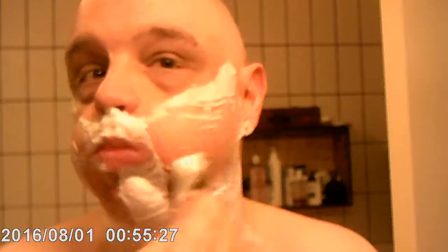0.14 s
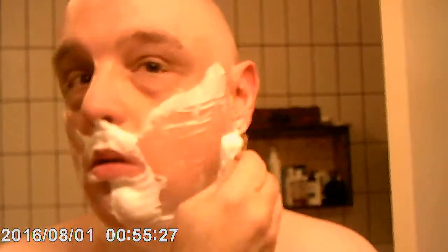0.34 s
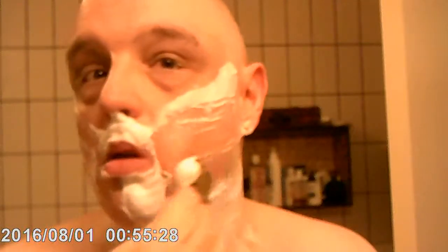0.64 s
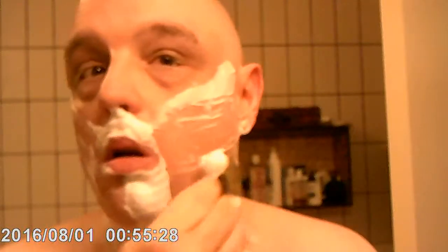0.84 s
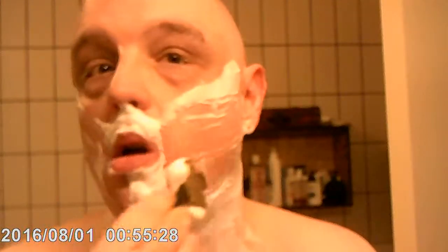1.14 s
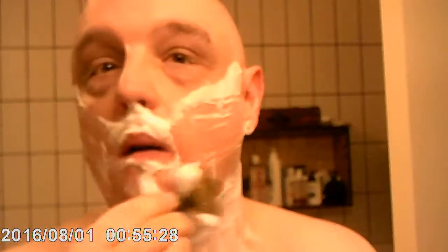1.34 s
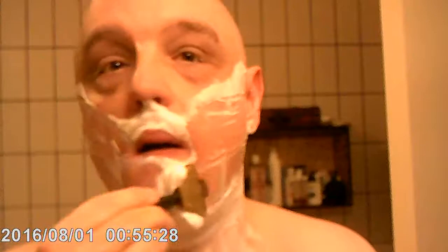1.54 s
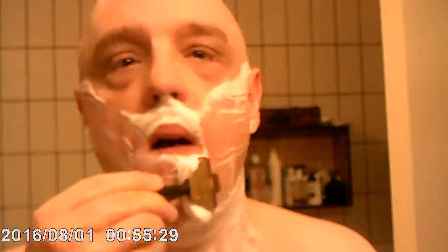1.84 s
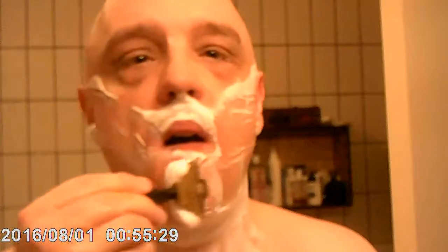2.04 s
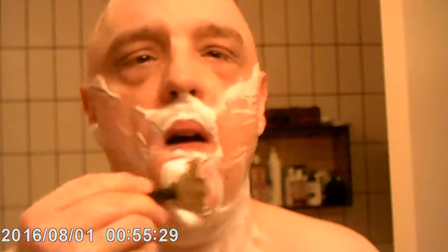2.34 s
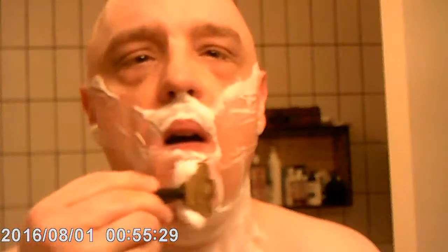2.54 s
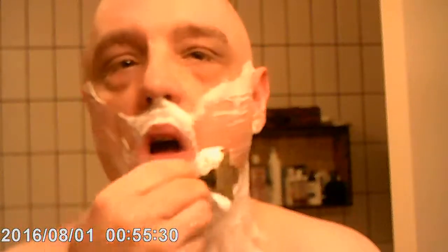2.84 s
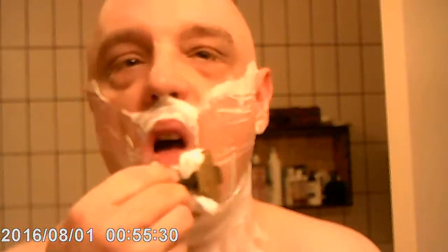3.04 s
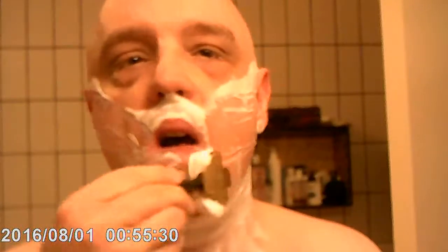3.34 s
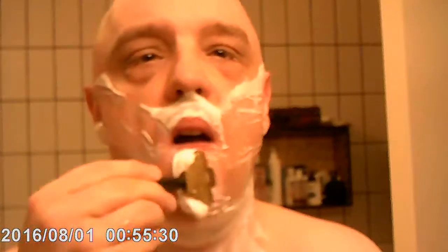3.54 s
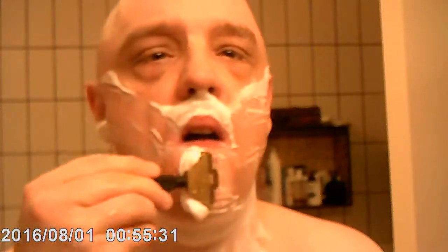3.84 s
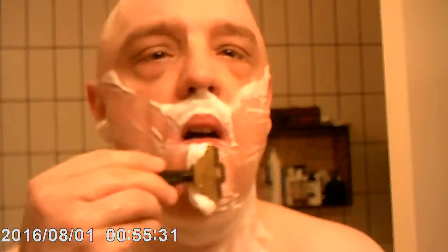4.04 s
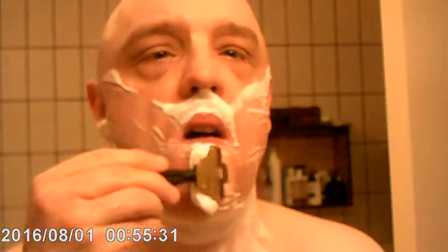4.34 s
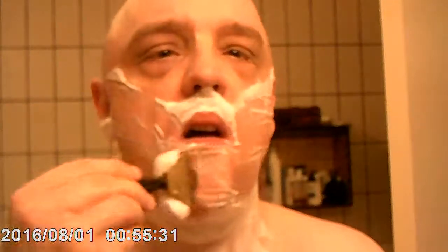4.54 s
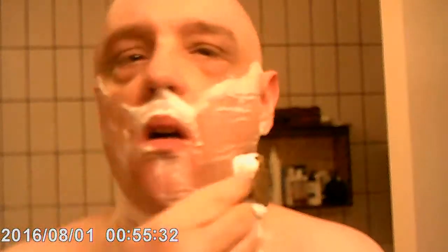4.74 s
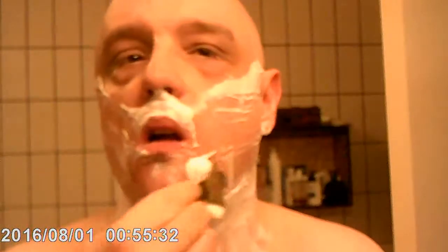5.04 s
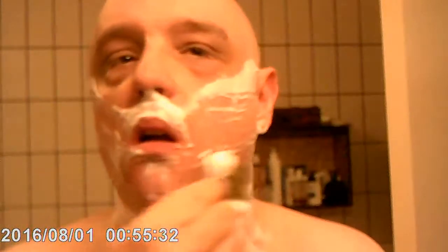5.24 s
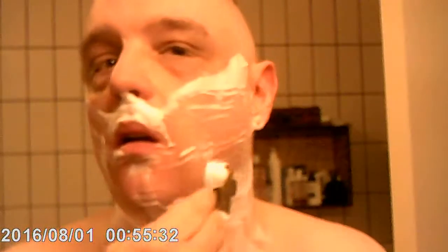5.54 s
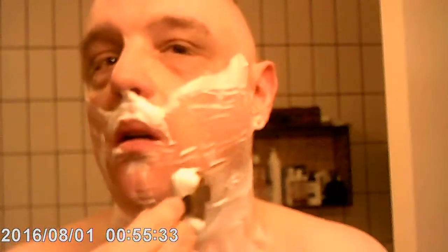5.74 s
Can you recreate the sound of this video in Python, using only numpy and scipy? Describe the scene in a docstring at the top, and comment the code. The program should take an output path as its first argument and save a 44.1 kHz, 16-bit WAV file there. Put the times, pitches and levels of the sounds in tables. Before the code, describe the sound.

In a small tiled bathroom, an extractor fan keeps up a low, gently throbbing hum. Close to a small, dull-sounding microphone, a razor starts rasping through wet stubble, and a soft pop of the lips follows almost at once. Brief scratchy strokes continue with little gaps, some single and some in quick pairs, the blade ticking on hairs. One clear tap stands out midway, and the strokes bunch together near the end.

```python
"""Wet shave in a tiled bathroom

Close up, a safety razor scrapes through lathered stubble in short strokes; each cut hair flicks the
steel blade. Early on, puffed cheeks let go with a dull pop of the lips. The small room answers, and
behind it all an extractor fan hums and rumbles, throbbing five times a second.
Heard through a small, narrow-band camera microphone."""
import sys
import numpy as np
from scipy import signal
from scipy.fft import rfft, irfft, next_fast_len
from scipy.io import wavfile
from scipy.ndimage import uniform_filter1d, map_coordinates

SR = 44100
rng = np.random.default_rng(int(sys.argv[2]) if len(sys.argv) > 2 else 0)


def file_out(sig):
    """Save sig as 16-bit WAV at sys.argv[1]."""
    # one column per channel
    cols = np.atleast_2d(sig).T
    # limit, then scale
    lim = np.clip(cols, -1, 1)
    pcm = np.round(lim * 32767).astype(np.int16)
    wavfile.write(sys.argv[1], SR, pcm)


N = 259749


def scrape():
    """The razor, close up: hairs snap on the edge in clumps and ring the blade's modes."""
    # modes of blade and razor head in three groups: f/Hz, width/Hz, level/dB
    low_modes = [(1024, 35, -6), (1180.5, 30, -2.5), (1268.5, 25, 1), (1336, 50, -6)]
    mid_modes = [(1424, 21, -3.5), (1574, 38, -2), (1758, 79, -8), (1785, 33, -3.5), (1938, 62, -9.5)]
    edge_modes = [(2110, 49, -2), (2471, 37, 2), (2597, 140, -2), (2773, 380, -4)]
    grip_db, slip_db = 1.5, 2.6
    snaps = snap_train(per_second=4000, spread_db=0.9)
    snaps *= amp(grip_db * wobble(45) + slip_db * wobble(140))
    snaps /= np.sqrt(uniform_filter1d(snaps ** 2, size=SR // 30))  # the hand evens out the force
    snaps = band(snaps, low_hz=1033.0, high_hz=3730)  # a thin blade radiates no bass
    blade = [unit(ringing(snaps, modes)) for modes in (low_modes, mid_modes, edge_modes)]
    return np.sum(hand_pressure() * blade, axis=0)


def hand_pressure():
    """Gains on the low, middle and edge modes: each pull bites, swells, drags and lifts."""
    # pulls of the razor: t/s, swell/s, drag/s, level/dB, bite/dB re level, edge brightness/dB,
    # tilt/dB (+ favours the low modes)
    strokes = [(0.0, 0.086, 0.03, -55, -1, -5.5, -3), (0.093, 0.024, 0.11, -51.5, -7.5, -5.5, 0),
               (0.488, 0.016, 0.14, -53, -3.5, -7, 0.5), (0.602, 0.054, 0.12, -47, -9, -9.5, 1.5),
               (1.093, 0.035, 0.045, -48.5, -0.5, -6, 2), (1.198, 0.065, 0.068, -56.5, -4, -12, -5),
               (1.529, 0.018, 0.014, -53, -6, -8, -1.5), (1.586, 0.037, 0.079, -55, -8, -8.5, -6),
               (1.929, 0.07, 0.04, -46, -10, -10.5, 0.5), (2.255, 0.06, 0.014, -52, -4, -10, 3),
               (2.557, 0.056, 0.029, -50, -3, -10, 0.5), (2.995, 0.14, 0.076, -56, 0, -13, -2),
               (3.431, 0.034, 0.085, -52, -3.5, -11, 2.5), (3.774, 0.055, 0.027, -56.5, -7, -14.5, 1),
               (3.849, 0.027, 0.064, -57, 2, -8, -4.5), (4.127, 0.04, 0.031, -54, -7, -9.5, -0.5),
               (4.428, 0.012, 0.049, -54, -4.5, -12, 1.5), (4.952, 0.019, 0.017, -58.5, -2, -11.5, 3.5),
               (4.969, 0.039, 0.02, -47.5, -5.5, -11, 4), (5.047, 0.027, 0.11, -53.5, -4.5, -11.5, 1.5),
               (5.225, 0.021, 0.069, -62.5, -0.5, -20.5, 5.5), (5.493, 0.049, 0.028, -53, 0.5, -13.5, 1.5),
               (5.564, 0.029, 0.11, -48, -18, -11.5, 2), (5.656, 0.067, 0.056, -53.5, -6.5, -5.5, -2.5),
               (5.79, 0.02, 0.12, -63.5, -5, -11, -9)]
    touch_s, lift_s = 0.004, 0.036  # the blade bites fast and leaves slowly
    drag_end_db, off_skin_db = -10.5, -24
    gains, t = np.zeros((3, N)), np.arange(N) / SR
    for start, swell, drag, db, bite_db, edge_db, tilt_db in strokes:
        knots = start + np.cumsum([0, touch_s, swell, drag, lift_s])
        force_db = db + np.interp(t, knots, [off_skin_db, bite_db, 0, drag_end_db, off_skin_db])
        balance = amp([[tilt_db / 2 - 6.0], [-tilt_db / 2 - 4.0], [edge_db]])
        on_skin = (t > start) & (t < knots[-1])
        gains += balance * amp(force_db) * on_skin
    return gains


def catches():
    """A thick hair or a tap on the skin rings one mode, cracks along the edge and knocks the jaw."""
    # single loud catches of the blade: t/s, level/dB, f/Hz, relative crack level/dB
    snags = [(0.095, -45, 1250, -6), (0.117, -34, 1610, 3.5), (0.1333, -38, 1555, -6),
             (0.497, -58, 1330, -16), (0.608, -47, 1665, -15), (0.655, -46.5, 1290, -1.5),
             (0.9636, -41, 1240, -27), (1.063, -43, 1660, 2.5), (1.097, -38.5, 1486, -13.5),
             (1.103, -34, 1140, -4), (1.1335, -51, 1680, 4.5), (1.5436, -41, 1775, -7.5),
             (1.552, -41.5, 1506, -7.5), (1.6237, -40, 1530, -18), (1.9597, -49, 1615, -11),
             (2.0027, -38.5, 1580, -29), (2.2576, -41, 1600, -10), (2.273, -41, 1606, -15.5),
             (2.291, -40, 1490, -15.5), (2.31, -44, 1530, -21.5), (2.5608, -39.5, 1580, -11),
             (2.5979, -39.5, 1540, -12), (2.6124, -39, 1580, -13), (2.997, -39.5, 1530, -16),
             (3.05, -45, 1640, -14.5), (3.15, -44.5, 1600, -15), (3.4547, -33.5, 1625, -27),
             (3.469, -39.5, 1293, -24), (3.817, -41, 1610, -13), (3.8523, -36.5, 1250, -16.5),
             (4.152, -42, 1580, -14), (4.431, -39.5, 1580, -20), (4.452, -42, 1590, -19),
             (5.002, -41.5, 1280, -18), (4.9754, -36, 1300, -13.5), (5.084, -47, 1283, -16),
             (5.156, -43.5, 1247, -15.5), (5.4995, -44.5, 1620, -25), (5.541, -50.5, 1645, -22),
             (5.639, -40.5, 1560, -4), (5.69, -48, 1200, 2), (5.703, -41.5, 1310, -8),
             (5.717, -38, 1800, -33), (5.8065, -43, 1460, -4.5)]
    # a faint, brief high ping; later one clear tap that rings. One row a tone: t/s, level/dB, f/Hz, t60/s
    pings = [(0.7437, -48, 3200, 0.054), (3.3639, -22.5, 1302, 0.021), (3.364, -27.5, 1230, 0.01),
             (3.364, -34.5, 1415, 0.015), (3.363, -41.5, 452, 0.032)]
    rings, cracks, t = np.zeros(N + SR), np.zeros(N + SR), np.arange(SR // 8) / SR
    jaw_knock = amp(-11.5) * decaying(hz=433, t60=0.036, t=t)
    for start, db, hz, crack_db in snags:
        add_at(rings, start, amp(db) * (decaying(hz, t60=0.023, t=t) + jaw_knock))
        add_at(cracks, start, amp(db + crack_db - 60 * t / 0.013) * rng.standard_normal(len(t)))
    for start, db, hz, t60 in pings:
        add_at(rings, start, amp(db) * decaying(hz, t60, t))
    return rings[:N] + amp(4.0) * band(cracks[:N], low_hz=1990, high_hz=2730)


def lip_pop():
    """Trapped air escapes in short, hollow puffs as the lips part; softer contacts are duller."""
    # lips parting and flapping: t/s, level/dB, upper cutoff f/Hz
    flaps = [(0.2079, -14.5, 2600), (0.217, -13.5, 1730), (0.2245, -17, 915), (0.237, -18, 1320),
             (0.251, -20.5, 700), (0.269, -22.5, 700), (0.28, -22.5, 1190), (0.31, -23.5, 790)]
    # low, hollow resonances of the pop: f/Hz, width/Hz, level/dB
    pop_modes = [(49.9, 29, -5), (187, 70, 1.5), (294, 90, 5), (386, 97, 2.5), (481, 23, 7.5),
                 (740, 100, -6.5), (1064, 67, -1.5), (1376, 150, -2)]
    puff_t60_s, flutter = 0.0012, 0.25
    puffs, t = np.zeros(N + SR), np.arange(SR // 20) / SR
    for start, db, top_hz in flaps:
        puff = amp(db - 60 * t / puff_t60_s) * (1 + flutter * rng.standard_normal(len(t)))
        add_at(puffs, start, band(puff, low_hz=40, high_hz=top_hz))
    return -ringing(puffs[:N], pop_modes)


def foam():
    """Lather bubbles burst in a faint, fine fizz."""
    fizz = band(snap_train(per_second=3200, spread_db=0.9), low_hz=1840, high_hz=3800)
    return amp(-73 + wobble(12)) * unit(fizz)


def wall_slaps(ticks):
    """Facing tiled walls return each tick."""
    # echoes: delay t/s, level/dB
    echoes = [(0.014, -8.5), (.036, -17)]
    return sum(amp(db) * np.pad(ticks, (round(delay * SR), 0))[:N] for delay, db in echoes)


def bathroom(x):
    """The tiled room rings on; each frequency dies at its own speed."""
    # reverberation time: f/Hz, t60/s
    decay_times = [(200, 0.26), (1200, 0.45), (3500, 0.26)]
    hz, t, spectrum = signal.stft(rng.standard_normal(SR // 2), SR, nperseg=256)
    decay = amp(-60 * t / along(decay_times, hz)[:, None])
    _, tail = signal.istft(spectrum * decay, SR, nperseg=256)
    delayed = np.pad(x, (300, 0))  # about 7 ms
    return signal.fftconvolve(delayed, tail / np.linalg.norm(tail))[:N]


def fan():
    """The extractor behind: blade-rate hum, rumble and air; once a throb it thumps and the hum ducks."""
    # fan tones: multiple of the blade rate, level/dB
    harmonics = [(1, -3.5), (2, -9.5), (3, -17.5), (4, -22.5)]
    # the duct's low resonance: f/Hz, width/Hz, level/dB
    duct_mode = [(19.4, 33, 0)]
    # spectra of the lumpy rumble and the smooth moving air: f/Hz, relative level/dB
    rumble_spectrum = [(4.7, -36.5), (8.0, 5), (29, -3.5), (76, -8), (125, -18), (160, -46.5), (280, -120)]
    air_spectrum = [(62, -34), (105, -2.5), (129, -18), (143, -3.5), (162, 0), (188, -10.5), (227, -11),
                    (313, -11.5), (418, -15.5), (602, -18.5), (1190, -23.5), (1440, -24.5), (1720, -28.5),
                    (2300, -34), (2900, -44.5), (3400, -42), (4420, -64), (7480, -120)]
    blade_hz, throb_hz, first_crest_s, first_thump_s = 160.6, 4.98, 0.043, 0.114
    throb = np.cos(2 * np.pi * throb_hz * (np.arange(N) / SR - first_crest_s))

    phase = 2 * np.pi * np.cumsum(blade_hz + 1.6 * wobble(11.0)) / SR
    suction = -sum(amp(db) * np.cos(k * phase) for k, db in harmonics)  # in step: one pulse per blade
    hum = amp(-53.5 + 4 * np.tanh(2.0 * throb + 0.29) + 1.7 * wobble(14)) * suction

    kicks, times = np.zeros(N), np.arange(first_thump_s, N / SR - 0.05, 1 / throb_hz)
    time_jitter, level_jitter = rng.standard_normal((len(times), 2)).T
    kicks[((times + 0.006 * time_jitter) * SR).astype(int)] = amp(2 * level_jitter)
    soft_kicks = np.convolve(kicks, np.hanning(SR // 60), "same")
    thumps = amp(-48) * unit(ringing(soft_kicks, duct_mode))

    rumble = amp(-43) * unit(amp(wobble(7.0)) * noise(rumble_spectrum))
    air = amp(-52 + 0.6 * wobble(5.6) + 0.73 * throb) * noise(air_spectrum)
    return hum + thumps + rumble + air


def amp(db):
    """Decibels to gain."""
    return 10 ** (np.asarray(db) / 20)


def unit(x):
    """Scaled to rms 1."""
    return x / np.sqrt(np.mean(x ** 2) + 1e-20)


def add_at(track, start_s, sound):
    """Mixes a sound into the track in place."""
    track[round(start_s * SR):][:len(sound)] += sound


def along(points, hz):
    """Interpolates (f/Hz, value) points on a log frequency axis."""
    f, values = np.transpose(points)
    return np.interp(np.log(hz + 1), np.log(f + 1), values)


def wobble(rate):
    """A smooth random curve, rate knots a second."""
    knots = rng.standard_normal(int(N * rate / SR) + 4)
    return map_coordinates(knots, [np.arange(N) * rate / SR])


def snap_train(per_second, spread_db):
    """A dense train of tiny snaps of uneven size, rms 1."""
    hits = rng.random(N) < per_second / SR
    return unit(hits * rng.standard_normal(N) * amp(spread_db * rng.exponential(1, N)))


def noise(spectrum):
    """Coloured noise of rms 1."""
    return unit(filtered(rng.standard_normal(N), lambda f: amp(along(spectrum, f))))


def decaying(hz, t60, t):
    """A damped sine with a soft start."""
    return amp(-60 * t / t60) * np.sin(2 * np.pi * hz * t) * (1 - np.exp(-t / 0.0022))


def filtered(x, response):
    """x through a complex frequency response."""
    size = next_fast_len(N + SR // 2)
    return irfft(rfft(x, size) * response(np.fft.rfftfreq(size, 1 / SR)), size)[..., :N]


def ringing(x, modes):
    """x through parallel causal resonances of alternating sign."""
    def response(f):
        return sum((-1) ** k * amp(db) * 1j * f * width / (hz * hz - f * f + 1j * f * width)
                   for k, (hz, width, db) in enumerate(modes))
    return filtered(x, response)


def band(x, low_hz, high_hz):
    """A steep causal band-pass."""
    return signal.sosfilt(signal.butter(4, [low_hz, high_hz], "band", fs=SR, output="sos"), x)


def scene():
    """Razor and lips near the microphone, tiles all round, the fan underneath; mono."""
    rasp, ticks, lips = scrape(), catches(), lip_pop()
    room = bathroom(amp(-7.0) * rasp + amp(-15.5) * ticks + amp(-5.5) * lips)
    return (rasp + ticks + lips + foam() + wall_slaps(ticks) + room + fan())[None]


def record(dry):
    """The small camera microphone dulls toward its band limit and keeps nothing above it."""
    rolloff_hz, limit_hz = 3150, 3553
    return filtered(dry, lambda hz: (hz < limit_hz) / np.sqrt(1 + (hz / rolloff_hz) ** 24))


dry = scene()
out = record(dry)
file_out(out)
```